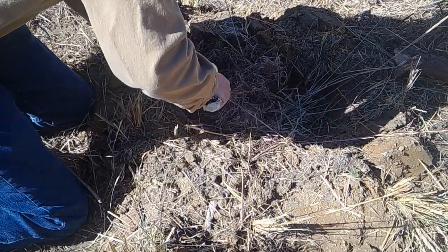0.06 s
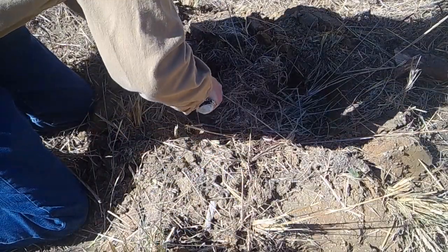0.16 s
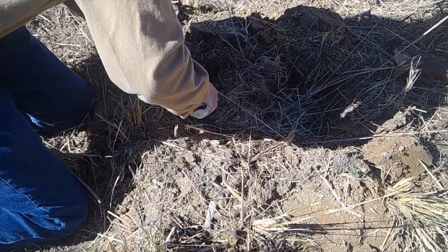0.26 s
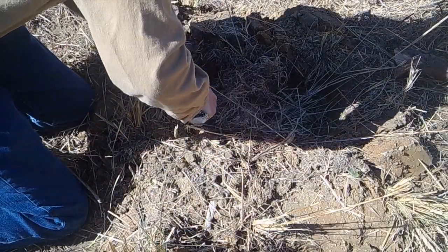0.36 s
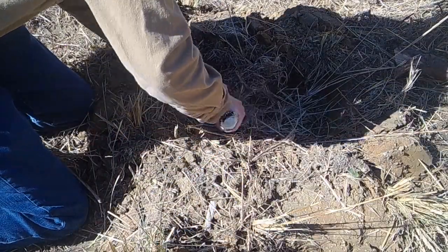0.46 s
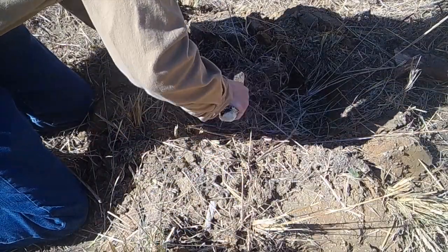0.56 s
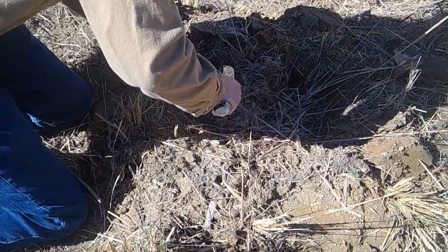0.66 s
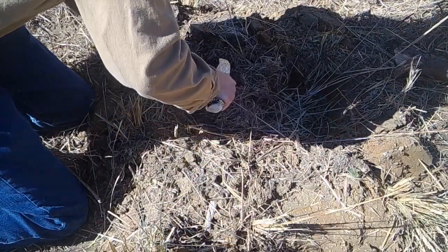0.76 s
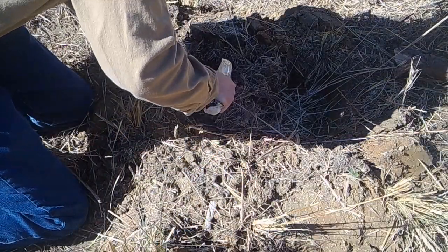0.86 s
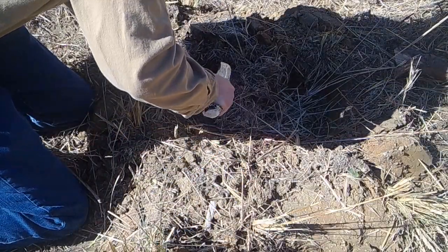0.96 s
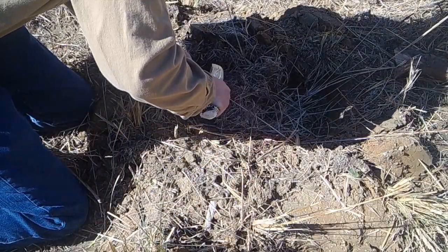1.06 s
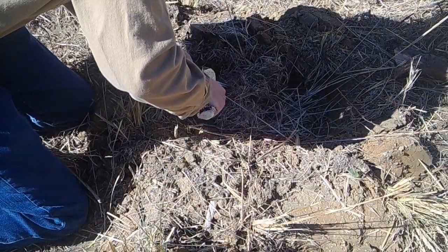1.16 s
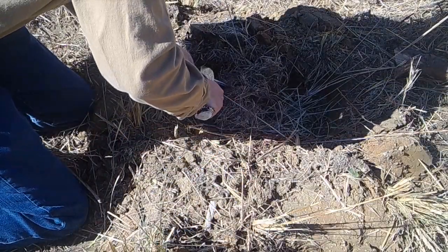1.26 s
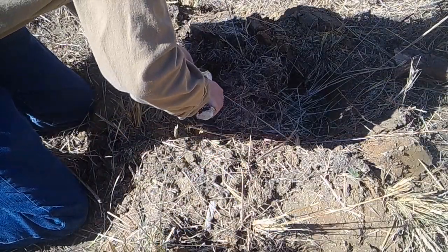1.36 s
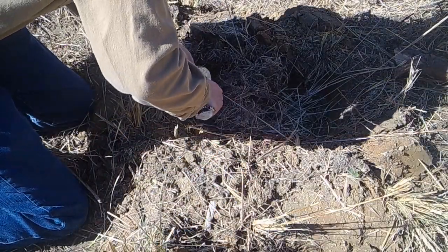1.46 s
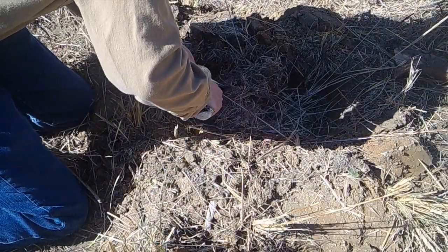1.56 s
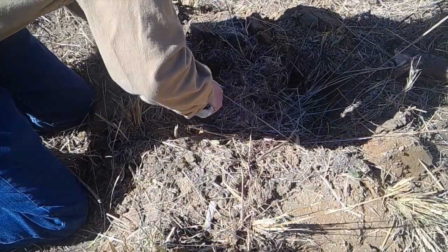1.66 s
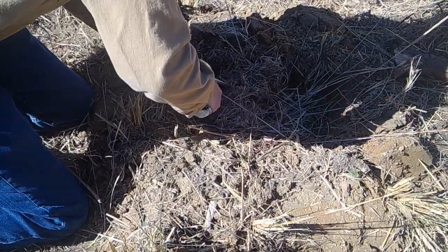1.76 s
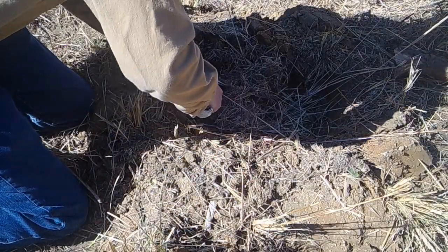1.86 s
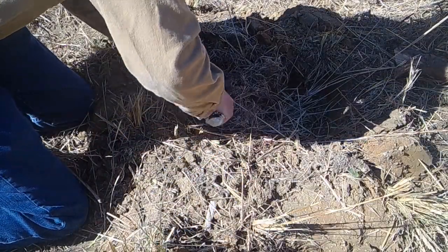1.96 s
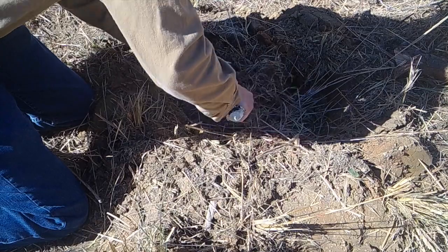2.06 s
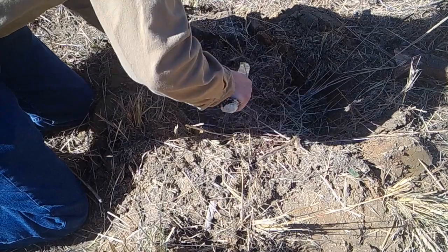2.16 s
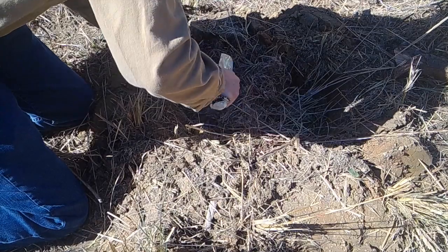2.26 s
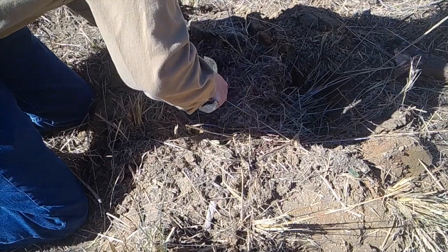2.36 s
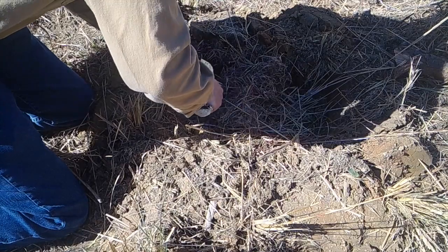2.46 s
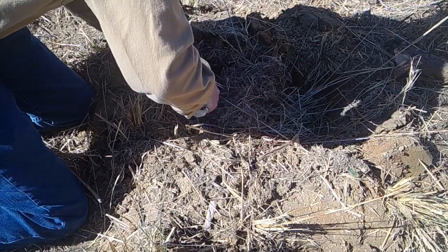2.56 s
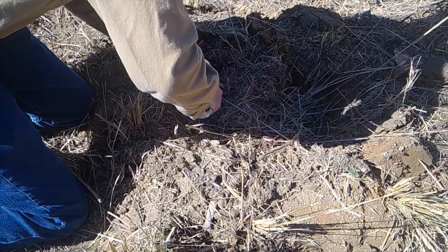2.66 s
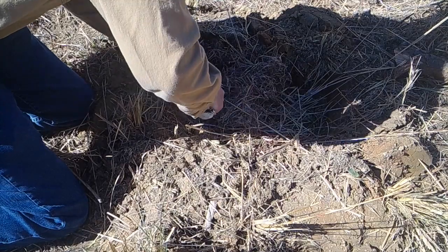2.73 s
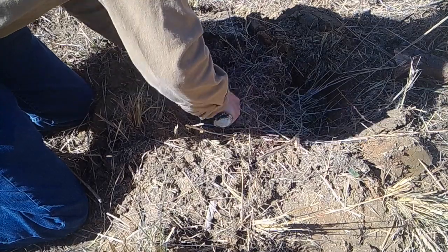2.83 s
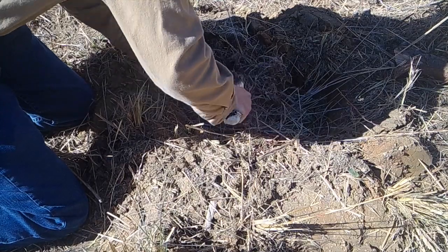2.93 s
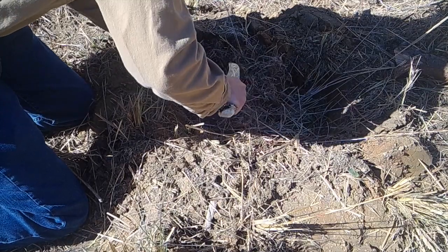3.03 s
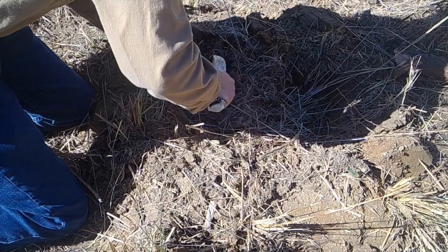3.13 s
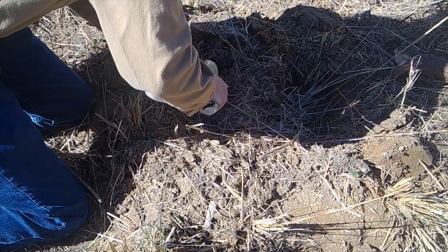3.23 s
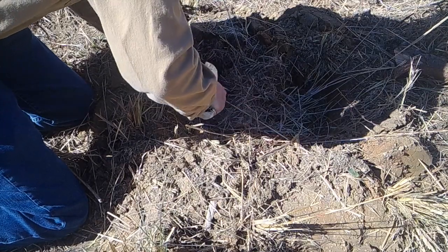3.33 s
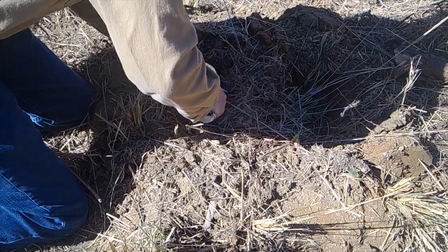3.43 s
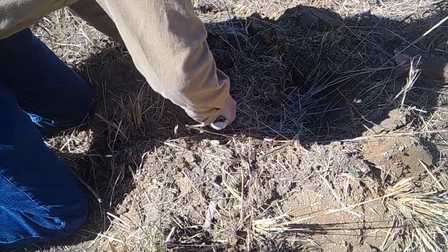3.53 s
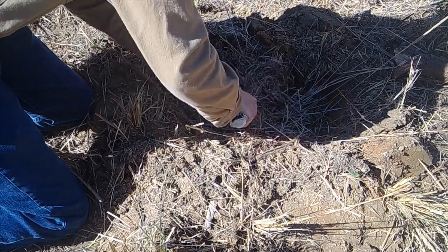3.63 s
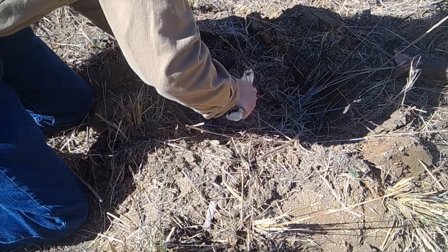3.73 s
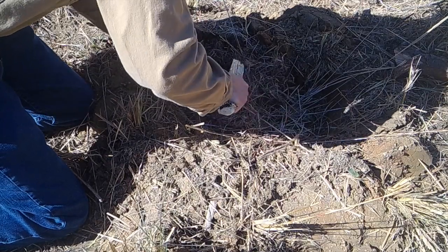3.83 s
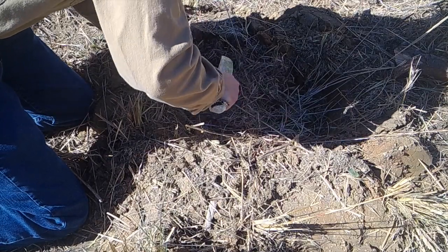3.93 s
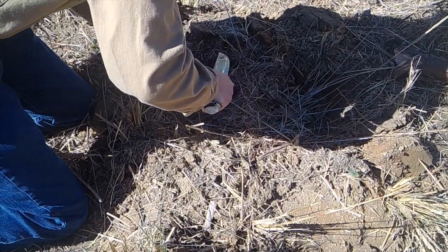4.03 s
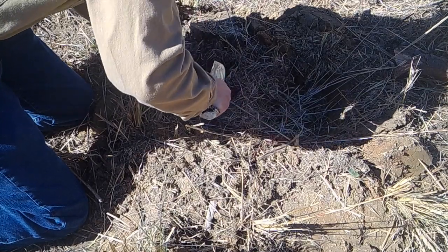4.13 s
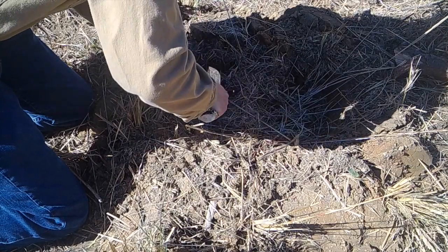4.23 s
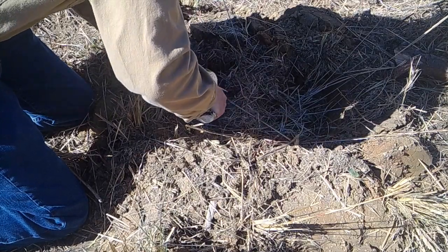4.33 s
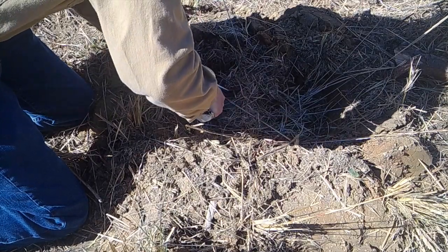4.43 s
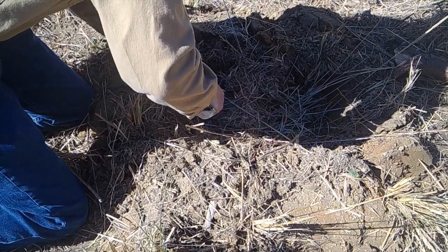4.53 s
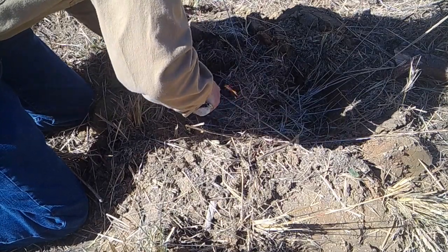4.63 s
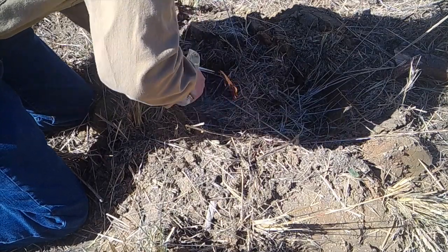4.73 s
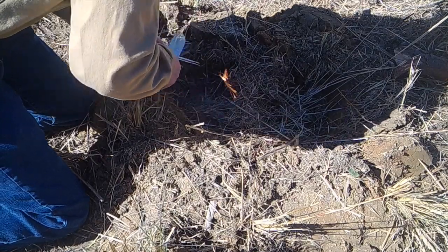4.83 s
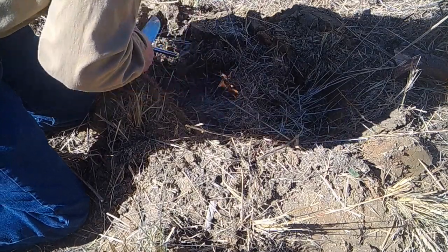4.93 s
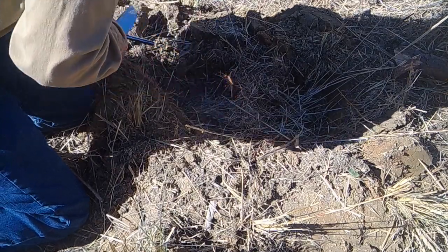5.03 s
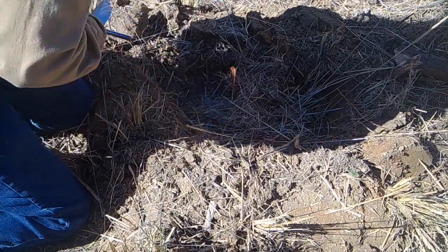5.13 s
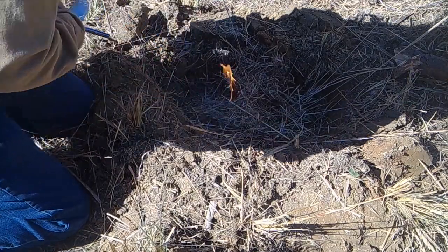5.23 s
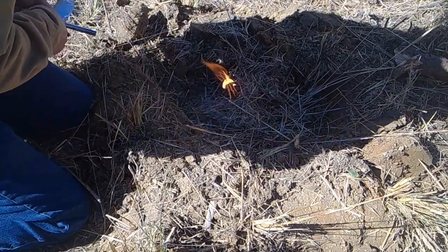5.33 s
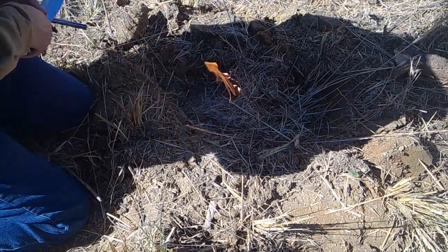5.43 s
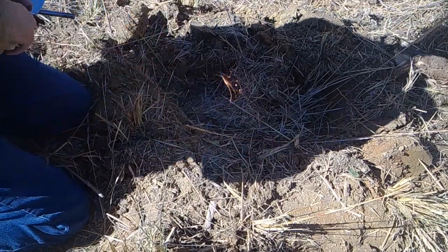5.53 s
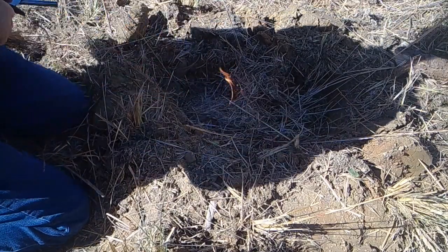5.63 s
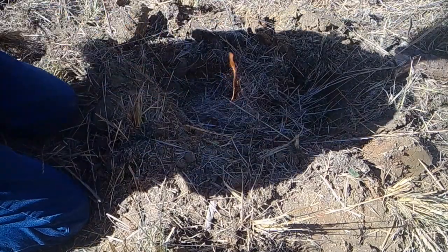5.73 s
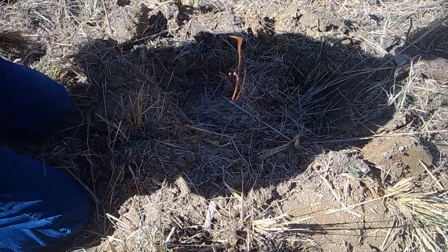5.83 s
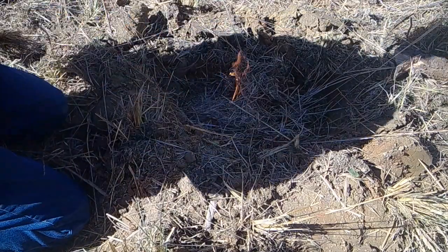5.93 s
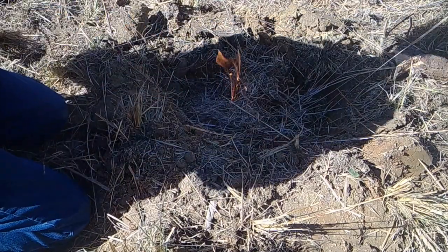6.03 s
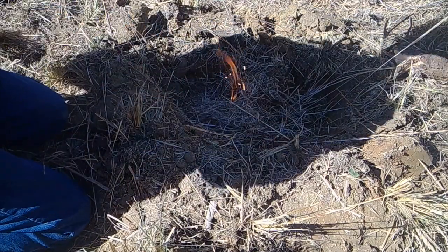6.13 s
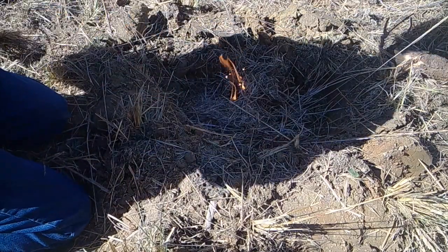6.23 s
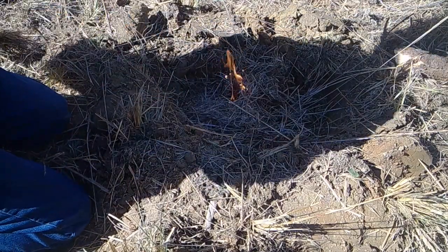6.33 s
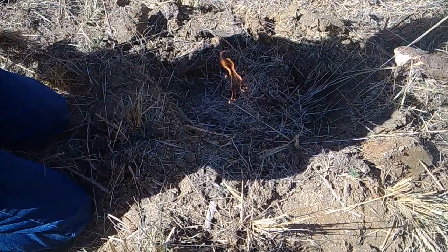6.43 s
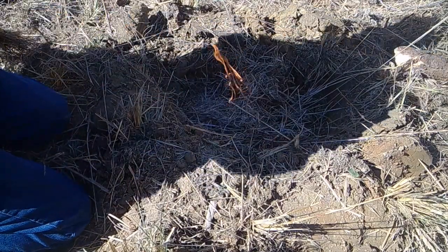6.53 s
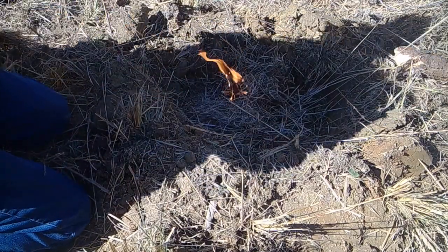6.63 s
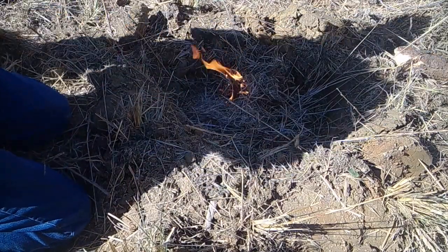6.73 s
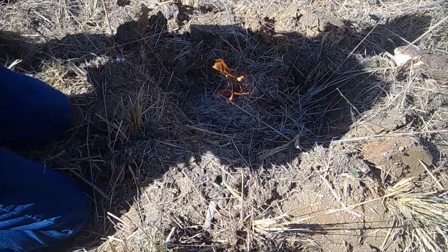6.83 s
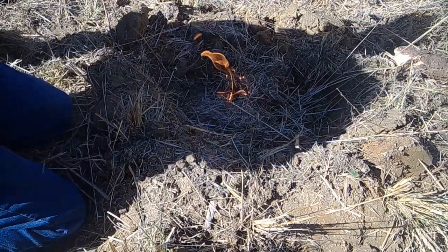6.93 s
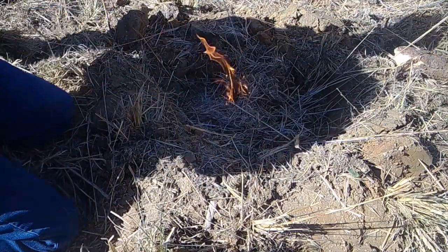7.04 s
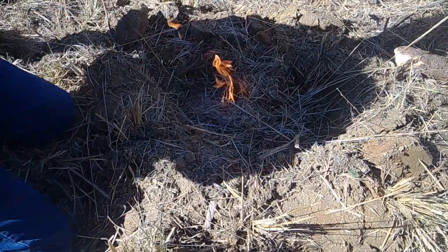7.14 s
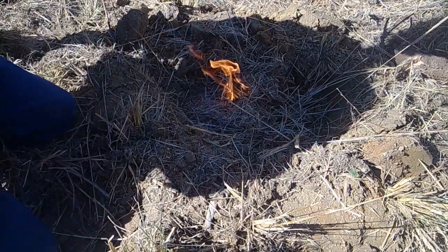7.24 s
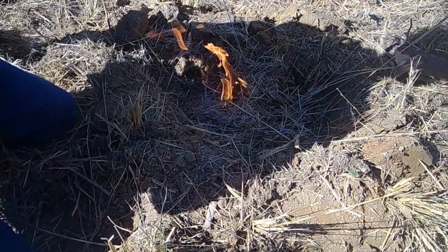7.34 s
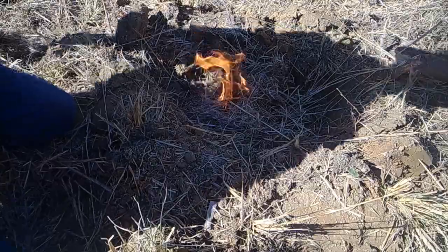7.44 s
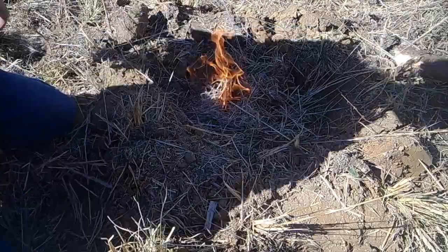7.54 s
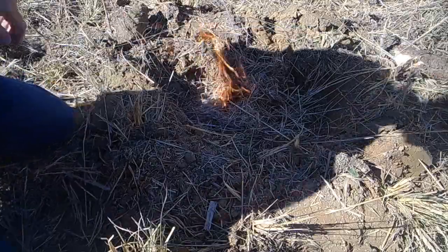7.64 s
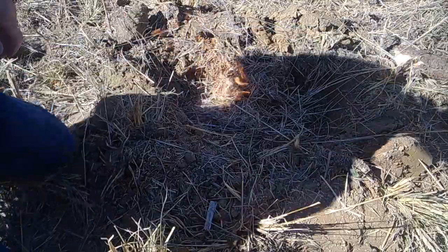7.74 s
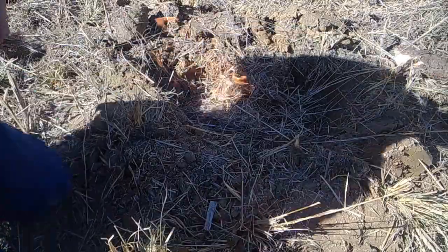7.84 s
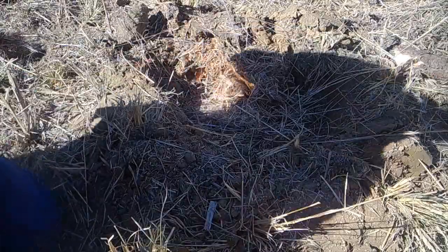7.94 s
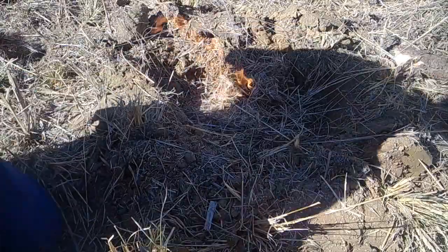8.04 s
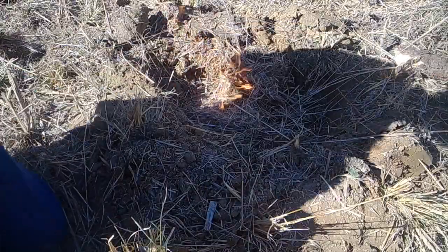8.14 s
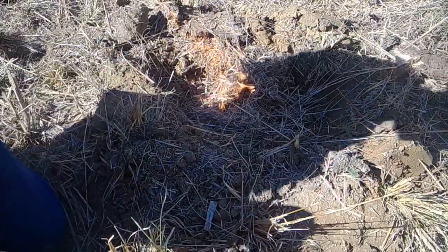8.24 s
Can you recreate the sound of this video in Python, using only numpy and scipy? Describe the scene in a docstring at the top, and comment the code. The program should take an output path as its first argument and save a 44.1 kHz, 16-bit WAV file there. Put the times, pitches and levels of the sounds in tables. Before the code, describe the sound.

Four abrupt metallic zips are spaced over the first few seconds, with hard little clicks as the blade is reset on the rod and sparks sizzling away after each scrape. Afterwards it quietens to faint grass crackle, then tools rattle and ring on the ground amid growing rustle and brittle snaps, with dull bumps last. Dry, close outdoor sound, no echo, light wind and hiss, boxy small-camera microphone.

```python
"""Fire from a ferro rod

A steel knife is set on a ferro rod and scraped down it in four hard strokes: stick-slip rings the blade,
and each stroke throws a fizz of sparks. The dry grass catches, rustling and crackling as many small fractures,
while the tools clink down on stony ground as decaying steel modes and the tinder is turned with dull bumps.
Filtered noise gives the brushing sleeve, open air and light wind; the case of a small camera filters it all."""
import sys
import numpy as np
from scipy import signal
from scipy.fft import rfft, irfft
from scipy.io import wavfile
from scipy.ndimage import uniform_filter1d

SR = 44100
rng = np.random.default_rng(int(sys.argv[2]) if len(sys.argv) > 2 else 0)


def wav_record(signal):
    """Record a signal, one row per channel, as 16-bit PCM in the file named by sys.argv[1]."""
    frames = np.transpose(np.atleast_2d(signal))
    bounded = np.clip(frames, -1, 1)
    # unit amplitude maps onto the largest positive 16-bit level
    quanta = np.round(bounded * 32767).astype(np.int16)
    wavfile.write(sys.argv[1], SR, quanta)


N = 365663
TIME = np.arange(N) / SR

# All levels hold ahead of the camera case; where an offset follows, the row says so.
# Hard strokes down the rod. Each row: start in seconds, length in seconds, slide level in dB, first bite in dB,
# last catch in dB, low ring in dB, contact resonance at the start in Hz, at the end in Hz, its lift in dB,
# pop in dB (offset in pop), pop length in seconds, boom in Hz, sparks in dB,
# sizzle in dB relative to the sparks (offset in sparks).
STROKES = [(0.426, 0.054, -20.5, -26, -17.5, -45, 3740, 3270, 14, -35.5, .03, 251, -41.5, -9.5),
           (1.9694, .044, -23.5, -10.5, -15, -21, 3730, 3020, 13, -30.5, .005, 102, -34, -13.5),
           (2.8226, .052, -27.5, -21, -22, -24.5, 3400, 2400, 8, -68, 0.0095, 200, -33.5, -18),
           (3.543, .044, -29.5, -32, -11.5, -21, 3000, 2250, 8.5, -40.5, .004, 298, -28.5, -20.5)]
# Blade set on the rod. Each row: start in seconds, level in dB, chatter length in seconds,
# contact resonance in Hz, its lift in dB, pop in dB (offset in pop), boom in Hz.
KNOCKS = [(.251, -21.5, 0.0079, 3100, 7.5, -74, 400), (1.219, -19.5, 0.0076, 2840, 4, -70, 398),
          (1.4696, -26.5, 0.0049, 3360, 6.5, -70, 400), (2.4355, -11.5, 0.01, 3870, 6, -27.5, 242),
          (3.237, -15.5, 0.0042, 4460, 6.5, -55, 400), (4.303, -12, 0.012, 3420, 8.5, -28.5, 600),
          (4.664, -38.5, 0.0057, 2920, 13, -89.5, 400), (4.779, -24, 0.0081, 1470, 7.5, -76, 400)]
# Blade rubbed lightly into place. Each row: start in seconds, length in seconds, level in dB,
# swell over the rub in dB, contact resonance in Hz, its lift in dB.
RUBS = [(1.457, 0.025, -44, -6, 3080, 10), (2.54, 0.049, -41.5, 7, 3000, 8.5),
        (4.415, .031, -43.5, 2, 3740, 6), (4.752, 0.0377, -39.5, 3, 2480, 14)]
# Tools set down on the ground. Each row: start in seconds, level in dB, rattle length in seconds,
# contact resonance in Hz, its lift in dB, damping time to 1/e in seconds.
CLINKS = [(6.845, -27.5, .003, 2210, 12, 0.02), (6.89, -34.5, 0.0085, 2140, 23, 0.068),
          (7.043, -29.5, 0.031, 2110, 24, 0.041), (7.086, -27, 0.025, 2110, 16, 0.028),
          (7.223, -19, 0.012, 3410, 6.5, .4), (7.236, -23, .016, 2120, 7, 0.14),
          (7.284, -18.5, 0.017, 3380, 13, 0.22)]
# Single stalks snapping. Each row: start in seconds, level in dB, treble in dB relative (offset in snaps).
SNAPS = [(.564, -38, -4), (5.361, -36.5, -17), (5.416, -39.5, -9.5), (5.666, -33, -21), (6.29, -34.5, -15),
         (6.553, -55, -3), (7.366, -33.5, -6), (7.45, -27.5, -16.5), (7.483, -34, -9), (7.548, -36, -6.5),
         (7.653, -30.5, -27), (7.781, -26.5, -7.5), (7.8456, -21.5, -18), (7.89, -32.5, -5),
         (8.0489, -18.5, -43), (8.097, -26.5, -19), (8.265, -31, -21)]
# Dry grass stirred. Each row: peak in seconds, rise in seconds, fall in seconds, rustle in dB,
# treble in dB relative to it (both offset in grass).
STIRS = [(5.06, 0.16, .05, -39.5, -17), (5.23, 0.11, 0.17, -50, -16), (5.67, 0.076, 0.11, -43, -18.5),
         (5.97, 0.49, 0.27, -46, -17.5), (6.281, 0.13, 0.059, -43, -27), (7.05, 0.21, 0.2, -35.5, -19.5),
         (7.29, 0.098, 0.15, -31.5, -21), (7.809, 0.13, 0.11, -29, -19.5), (8.0, 0.037, 0.015, -32, -22),
         (8.2, 0.45, 0.78, -40, -17)]
# Dull bumps as the tinder is turned. Each row: start in seconds, level in dB, crack in dB relative
# (both offset in pop), boom in Hz.
BUMPS = [(8.047, -39, -6, 350), (8.264, -41.5, 2, 100)]
# Sleeve brushing. Each row: peak in seconds, rise in seconds, fall in seconds, level in dB (offset in sleeve).
BRUSHES = [(1.44, 0.11, .12, -47.5), (1.68, 0.14, 0.067, -44), (1.87, 0.061, 0.034, -49),
           (2.411, 0.14, 0.11, -58)]
# Gusts on the case. Each row: peak in seconds, rise in seconds, fall in seconds, level in dB (offset in outdoors).
GUSTS = [(3.26, 0.055, .12, -62.5), (3.75, .03, .06, -59.5), (4.35, 0.39, 0.58, -63)]

# Modes of the knife on the rod, before contact stiffens them.
# Each row: frequency in Hz, level in dB, time to decay by 60 dB in seconds (before choking).
ROD_MODES = [(1300, -4, 0.16), (1760, -17, 0.047), (2038, -1.5, 0.2), (2434, -1, 0.11), (3110, -2.5, 0.14),
             (3468, 5.5, 0.021), (3648, -0.5, 0.12), (3960, -5.5, 0.031), (4640, -18, 0.016),
             (4890, -4, 0.024), (5370, -11.5, 0.053), (6756, -8.5, 0.11), (8900, -12.5, 0.023),
             (10600, -18, 0.033)]
# Modes of loose steel on the ground. Each row: frequency in Hz, level in dB, 60 dB decay in seconds (undamped).
STEEL_MODES = [(1441, -8, 0.92), (1855, -2, 0.27), (2127, 0, 0.13), (2440, -2, .06), (2930, -3, 0.087),
               (3126, -7.5, 0.14), (3410, -6, 0.24), (4360, -5, 0.044)]

# Spectra of the sources and response of the case. Each row: frequency in Hz, gain in dB.
AIR = [(30, -7.5), (120, -0.5), (500, -1.5), (1300, 1.5), (2100, 2.5), (3000, 2), (4200, -8), (6800, -17),
       (10000, -14), (15500, -13.5)]
RUSTLE = [(100, -15), (500, -10.5), (1000, -5.5), (1400, -6), (2100, 1), (3000, 4.5), (4200, -3),
          (7000, -8), (10000, -10.5), (15500, -26)]
SIZZLE = [(1000, -19.5), (4000, 2), (7000, 5), (9000, 7), (11500, 3), (15500, -1)]
CLOTH = [(200, -26), (1200, -2), (2200, 11), (4000, 7.5), (6500, 0), (9000, -37), (15500, -31)]
CLICK = [(60, -39), (800, -17), (1400, -4), (2800, 5.5), (5000, -3), (8000, -16.5), (15500, -36)]
THUD = [(30, 2.5), (120, -3.5), (240, 1.5), (450, -2.5), (750, 2), (1200, -11), (3000, -57), (10000, -27)]
CASE = [(30, -9), (950, -10.5), (1350, -2.5), (2100, -3.5), (3400, -6), (4300, -8), (5400, -16),
        (6850, -6.5), (7500, -17.5), (9000, -18), (11700, -13), (15500, -20.5)]
# Bands where sound cancels inside the case. Each row: centre in Hz, width in Hz.
CASE_NULLS = [(5980, 1890), (8020, 1020)]
TOP_HZ = 15850  # upper limit of the case

# The pressed contact chatters and is stiffer; near its tip the rod rings low.
CHATTER_S, PRESSED_HZ, LOW_RING_HZ, LOW_LIFT_DB = 0.0093, 717, 1470, 21
# A light touch swells into each stroke; its level is relative to the slide.
LEAD_S, LEAD_DB, LEAD_SWELL_DB = .009, -15.5, 8
# The low ring and the catch come this long before the end of the stroke.
LOW_RING_S, CATCH_S = 0.017, .012
# The fire: when it catches, then its crackle and treble settings (both offset in grass).
CATCHES_FIRE_S, FIRE_DB, FIRE_TREBLE_DB = 4.8, -57, -86
# Open air, and the wind between gusts (offset in outdoors).
AIR_DB, CALM_DB = -49, -76.5


def strokes(swell_db=1, bite_pop_s=.007, bite_pop_db=-27, last_pop_s=.006, crack_db=-8):
    """Stick-slip: the edge touches, bites, slides as its resonance falls, and catches with a pop and sparks."""
    out = np.zeros(N)
    for (s, length, slide_db, bite_db, catch_db, low_db, start_hz, end_hz, lift_db,
         pop_db, pop_s, boom_hz, sparks_db, sizzle_db) in STROKES:
        end = s + length
        touch = slide(LEAD_S, slide_db + LEAD_DB, LEAD_SWELL_DB, start_hz, start_hz, lift_db)
        add(out, s - LEAD_S, touch)
        add(out, s, knock(bite_db, CHATTER_S, start_hz, lift_db, PRESSED_HZ))
        add(out, s + bite_pop_s, pop(bite_db + bite_pop_db, 0.0029, crack_db, boom_hz))
        add(out, s, slide(length, slide_db, swell_db, start_hz, end_hz, lift_db))
        add(out, end - LOW_RING_S, knock(low_db, CHATTER_S, LOW_RING_HZ, LOW_LIFT_DB, PRESSED_HZ))
        add(out, end - CATCH_S, knock(catch_db, CHATTER_S, end_hz, lift_db, PRESSED_HZ))
        add(out, end - last_pop_s - pop_s, pop(pop_db, pop_s, crack_db, boom_hz))
        add(out, s, sparks(length - CATCH_S, sparks_db, sizzle_db))
    return out


def slide(length, db, swell_db, start_hz, end_hz, lift_db, slip_hz=240, jitter=.25, tooth_db=1.4,
          stiff_hz=770, wander=0.27, choke_s=0.0019, grit_db=-9, release_s=0.0035):
    """Stick-slip friction: each slip down the rod rings the pressed blade anew and tears off grit."""
    t = TIME[:int((length + .03) * SR)]
    tooth = TIME[:SR // 50]
    teeth = np.zeros(len(t) + len(tooth))
    slip_s = 0
    for gap, size, shift in rng.standard_normal((24, 3)):
        blade = ring(ROD_MODES, tooth, stiff_hz * (1 + wander * shift), scatter_db=4.0)
        blade = blade * np.exp(-tooth / choke_s)
        hz = np.interp(slip_s, [0, length], [start_hz, end_hz])
        slip = lift(through(blow(tooth, 0.0029, grit=2.2), blade), hz, lift_db, share=0.35)
        if slip_s < length:
            add(teeth, slip_s, unit(slip) * undb(tooth_db * size))
        slip_s += np.exp(jitter * gap) / slip_hz
    grit = colour(grains(len(t), 9000, 2.7), CLICK)
    grit = grit * np.exp(-np.maximum(t - length, 0) / release_s)
    pressure = np.minimum(t / 0.0033, 1) * undb(swell_db * np.minimum(t / length, 1))
    scrape = unit(teeth[:len(t)]) + undb(grit_db) * unit(lift(grit, start_hz, lift_db))
    # The last factor refers the level to the stroke's length, without its tail.
    return unit(scrape * pressure) * undb(db) * np.sqrt(len(t) / SR / length)


def knock(db, length, hz, lift_db, stiff_hz, click_db=-3, free=.16, choke_s=.0045):
    """Damped impact: steel meets the rod; the grip chokes most of the ring within milliseconds."""
    t = TIME[:SR // 8]
    force = blow(t, length, grit=1.8)
    modes = [(np.hypot(mode_hz, stiff_hz), mode_db, t60) for mode_hz, mode_db, t60 in ROD_MODES]
    steel = struck(modes, t, force, choke_s, free)
    click = unit(colour(force, CLICK))
    return burst(lift(steel + undb(click_db) * click, hz, lift_db, share=0.54), db)


def pop(db, length, bright_db, hz, thud_db=10, crack_db=17, boom_db=5.0):
    """Broadband impact: hard contacts carry a dull pop with a bright crack; both levels are offset here."""
    force = blow(TIME[:SR // 16], length, grit=1.62)
    thud = lift(colour(force, THUD), hz, boom_db, share=1.0)
    crack = colour(force, SIZZLE)
    return burst(thud, db + thud_db) + burst(crack, db + bright_db + crack_db)


def sparks(rise_s, db, bright_db, t60=0.41, sizzle_db=16):
    """Granular noise: burning shavings fly off in a growing shower, fizz and die away exponentially."""
    t = TIME[:SR // 2]
    fizz = unit(colour(grains(len(t), 9000, 2.2), RUSTLE))
    sizzle = unit(colour(grains(len(t), 9000, 2.6), SIZZLE))
    decay_db = -60 * np.maximum(t - rise_s, 0) / t60
    glow = np.minimum(t / rise_s, 1) * undb(db + decay_db)
    return glow * (fizz + undb(bright_db + sizzle_db) * sizzle)


def knocks(stiff_hz=150, pop_lag_s=0.00085, pop_s=0.0048, crack_db=-11):
    """Light impact: the blade is set on the rod, its contact less stiff than under a stroke."""
    out = np.zeros(N)
    for s, db, length, hz, lift_db, pop_db, boom_hz in KNOCKS:
        add(out, s, knock(db, length, hz, lift_db, stiff_hz))
        add(out, s + pop_lag_s, pop(pop_db, pop_s, crack_db, boom_hz))
    return out


def rubs():
    """Light friction: the edge sticks and slips into place too lightly to throw sparks."""
    out = np.zeros(N)
    for s, length, db, swell_db, hz, lift_db in RUBS:
        add(out, s, slide(length, db, swell_db, hz, hz, lift_db))
    return out


def clinks(click_db=-11, choke_s=0.0074, free=1.3):
    """Modal ringing: steel rattles on stony ground, dull while held and ringing once let go."""
    out = np.zeros(N)
    t = TIME[:SR // 2]
    for s, db, length, hz, lift_db, damp_s in CLINKS:
        force = blow(t, length, grit=0.91)
        steel = unit(struck(STEEL_MODES, t, force, choke_s, free) * np.exp(-t / damp_s))
        clink = steel + undb(click_db) * unit(colour(force, CLICK))
        add(out, s, burst(lift(clink, hz, lift_db, share=0.14), db))
    return out


def snaps(crisp_db=13, splinter=0.38, splinter_s=0.0067, stalk_hz=2600, stalk_db=5,
          small_db=-43, small_spread_db=3, small_treble_db=-12, count=14):
    """Brittle fracture: a sharp click and a few splinters; small snaps come at random once the fire has caught."""
    out = np.zeros(N)
    t = TIME[:SR // 20]
    slot_s = (N / SR - CATCHES_FIRE_S) / count
    small = []
    for k, (when, size) in enumerate(rng.random((count, 2))):
        level_db = small_db + small_spread_db * (2 * size - 1)
        small.append((CATCHES_FIRE_S + (k + when) * slot_s, level_db, small_treble_db))
    for s, db, bright_db in SNAPS + small:
        crack = colour(blow(t, splinter_s, grit=splinter), RUSTLE)
        crack = lift(crack, stalk_hz, stalk_db, share=1.0)
        fibres = colour(blow(t, .002, grit=1.5), SIZZLE)
        add(out, s, burst(crack, db) + burst(fibres, db + bright_db + crisp_db))
    return out


def grass(rustle_db=1, crisp_db=18, tick_rate=480, tick_spread_db=2.0, break_db=-3, hiss_db=-6):
    """Random excitation of resonators: rubbed and burning stalks tick at many pitches, among breaks and hiss."""
    burning = TIME > CATCHES_FIRE_S
    rustle_power = burning * undb(FIRE_DB) ** 2
    treble_power = burning * undb(FIRE_TREBLE_DB) ** 2
    for s, rise, fall, db, bright_db in STIRS:
        rustle_power = rustle_power + swell(s, rise, fall, db)
        treble_power = treble_power + swell(s, rise, fall, db + bright_db)
    stalks = np.zeros(N)
    for hz in np.geomspace(1100, 14000, 22):
        stalks += resonance(grains(N, tick_rate, tick_spread_db), hz, 260 + hz / 20)
    breaks = undb(break_db) * grains(N, 2500, 3.7)
    hiss = undb(hiss_db) * rng.standard_normal(N)
    crackle = unit(stalks) + breaks + hiss
    body = unit(colour(crackle, RUSTLE)) * undb(rustle_db) * np.sqrt(rustle_power)
    crisp = unit(colour(crackle + 0.97 * grains(N, 7000, 2.9), SIZZLE))
    crisp = crisp * undb(crisp_db) * np.sqrt(treble_power)
    return (body + crisp) * undb(1.43 * walk(45))


def bumps(length=.002):
    """Damped impact: short dull blows among the grass."""
    out = np.zeros(N)
    for s, db, bright_db, hz in BUMPS:
        add(out, s, pop(db, length, bright_db, hz, boom_db=3))
    return out


def sleeve(cloth_db=2):
    """Friction noise: cloth brushes as the arm lines up the next stroke."""
    cloth = unit(colour(grains(N, 12000, 2.5), CLOTH))
    power = sum(swell(*brush) for brush in BRUSHES)
    return cloth * undb(cloth_db) * np.sqrt(power)


def outdoors(wind_db=9, wind_hz=70):
    """Turbulence as filtered noise: a nearly even hiss of open air, with soft gusts rumbling on the case."""
    hiss = unit(colour(rng.standard_normal(N), AIR)) * undb(AIR_DB + 0.57 * walk(6.4))
    low_pass = signal.butter(2, wind_hz, fs=SR, output="sos")
    rumble = unit(signal.sosfilt(low_pass, rng.standard_normal(N)))
    wind = np.sqrt(undb(CALM_DB) ** 2 + sum(swell(*gust) for gust in GUSTS))
    return hiss + rumble * wind * undb(wind_db + 1.5 * walk(14))


def blow(t, length, grit):
    """Impulsive force: a first unit impact, then a short rattle whose root energy is grit."""
    force = grains(len(t), 9000, 2.8) * np.exp(-(t / length) ** 4)
    force *= grit / np.sqrt(np.sum(force ** 2) + 1e-18)
    force[0] += 1
    return force


def ring(modes, t, stiff_hz=0, scatter_db=0):
    """Modal sum: decaying sines of struck steel; a stiff contact raises the low ones most."""
    hz, db, t60 = np.transpose(modes)[:, :, None]
    db = db + scatter_db * rng.standard_normal(db.shape)
    sign = (-1) ** np.arange(len(modes))[:, None]
    decay = undb(db - 60 * t / t60)
    return np.sum(sign * decay * np.sin(2 * np.pi * np.hypot(hz, stiff_hz) * t), axis=0)


def struck(modes, t, force, choke_s, free):
    """Contact damping: chatter chokes the modes; what the first impact left in them rings on."""
    steel = ring(modes, t)
    return unit(through(force, steel * np.exp(-t / choke_s)) + free * steel)


def grains(n, rate, spread_db):
    """Shot noise: tiny fractures at random moments (rate per second), a few much larger than the rest; rms 1."""
    size = undb(spread_db * np.minimum(rng.exponential(size=n), 2 * np.pi))
    return unit((rng.random(n) < rate / SR) * size * rng.choice([-1, 1], n))


def swell(peak_s, rise_s, fall_s, db):
    """Exponential envelope: power of a movement that builds up to a peak and dies away."""
    distance = np.maximum((peak_s - TIME) / rise_s, (TIME - peak_s) / fall_s)
    return undb(db) ** 2 * np.exp(-2 * distance)


def walk(rate):
    """Random modulation: smooth drift with a spread near 1, from a new value rate times a second."""
    k = int(SR / rate)
    steps = np.repeat(rng.standard_normal(N // k + 1), k)
    return np.sqrt(2) * uniform_filter1d(steps, k)[:N]


def colour(x, points, size=2048):
    """Minimum-phase filtering: a causal filter that follows points of (Hz, dB)."""
    hz, db = np.transpose(points)
    bins = np.maximum(np.fft.rfftfreq(size, 1 / SR), 1)
    cepstrum = irfft(np.log(undb(np.interp(np.log(bins), np.log(hz), db))))
    # Folding the cepstrum onto positive time makes the filter causal.
    cepstrum[1:size // 2] *= 2
    cepstrum[size // 2 + 1:] = 0
    return through(x, irfft(np.exp(rfft(cepstrum))))


def resonance(x, hz, width):
    """Simple resonator: a band-pass with gain 1 at the centre, width in Hz."""
    return signal.lfilter(*signal.iirpeak(hz, hz / width, fs=SR), x)


def lift(x, hz, db, share=0.55):
    """Position of excitation: the place of contact favours one region of the spectrum."""
    width = hz * share
    return x + (undb(db) - 1) * resonance(resonance(x, hz, width), hz, width)


def through(x, response):
    """Convolution: pass x through an impulse response."""
    return signal.fftconvolve(x, response)[:len(x)]


def undb(db):
    """Logarithmic level: decibels to amplitude gain."""
    return 10 ** (np.asarray(db) / 20)


def unit(x):
    """Normalisation: scale to rms 1."""
    return x / np.sqrt(np.mean(x ** 2) + 1e-18)


def burst(x, db, size=132):
    """Short-time level: scale so that the loudest few milliseconds have this rms level."""
    return x * undb(db) / np.sqrt(uniform_filter1d(x ** 2, size, mode="constant").max() + 1e-18)


def add(out, s, x):
    """Superposition: mix x into out from time s in seconds."""
    i = max(int(s * SR), 0)
    out[i:i + len(x)] += x[:max(N - i, 0)]


def scene():
    """Superposition of all sources, close by and without walls."""
    tools = strokes() + knocks() + rubs() + bumps() + clinks()
    tinder = snaps() + grass()
    return (tools + tinder + sleeve() + outdoors())[None]


def record(dry):
    """Linear filtering: the camera case favours the upper middle, cancels two bands and cuts the top."""
    x = colour(dry[0], CASE)
    for hz, width in CASE_NULLS:
        x = signal.lfilter(*signal.iirnotch(hz, hz / width, fs=SR), x)
    low_pass = signal.ellip(10, .2, 70, TOP_HZ, fs=SR, output="sos")
    return signal.sosfilt(low_pass, x)[None]


dry = scene()
out = record(dry)
wav_record(out)
```